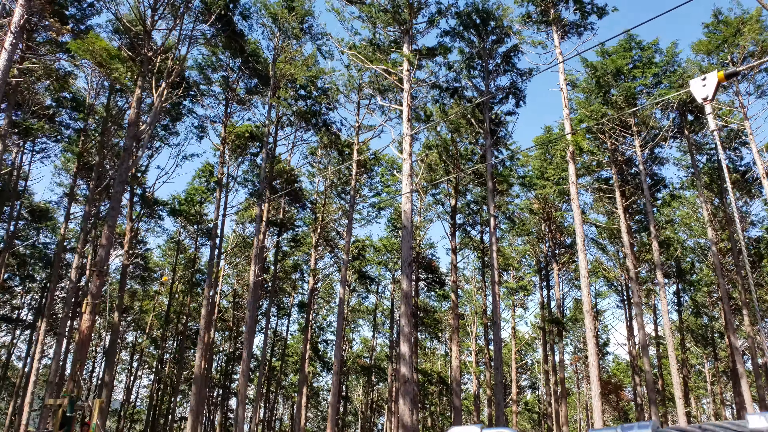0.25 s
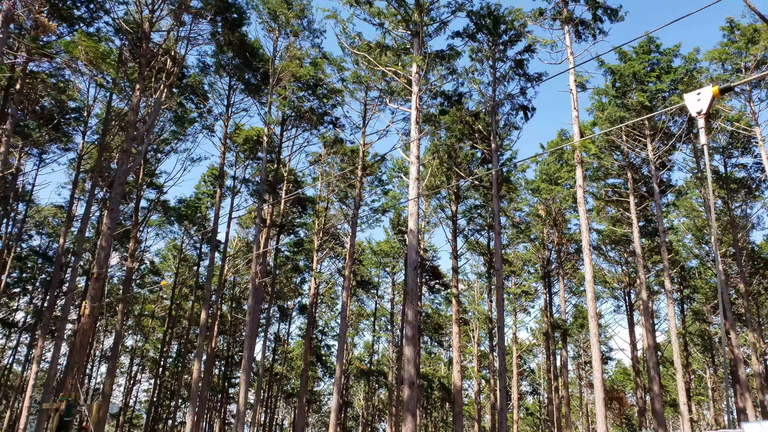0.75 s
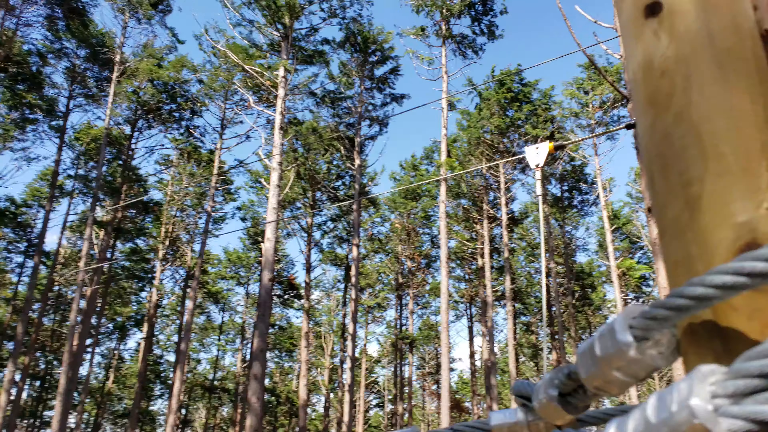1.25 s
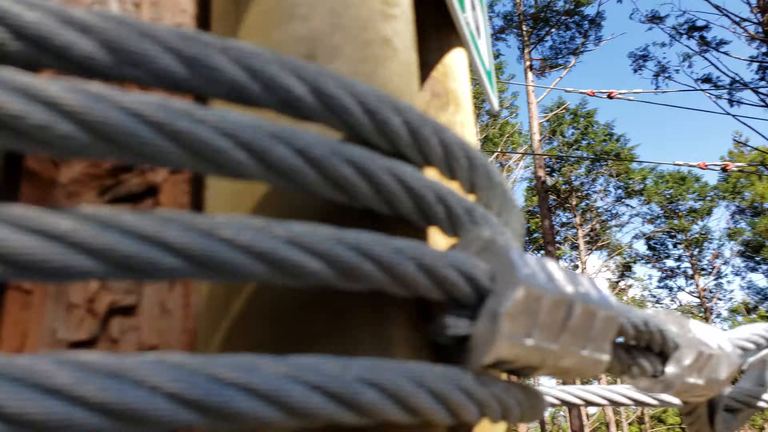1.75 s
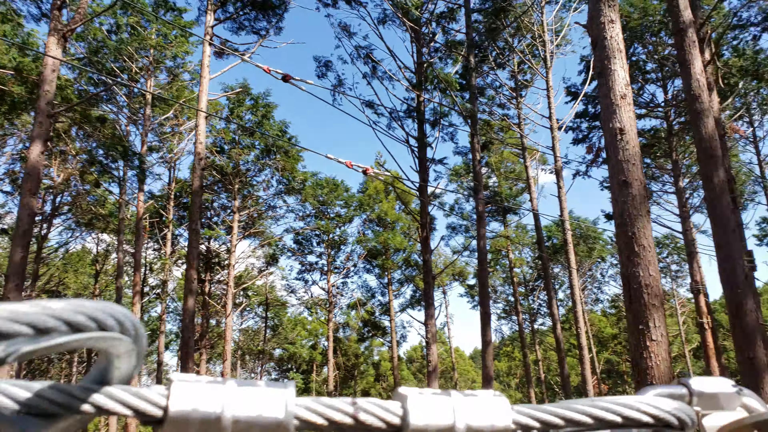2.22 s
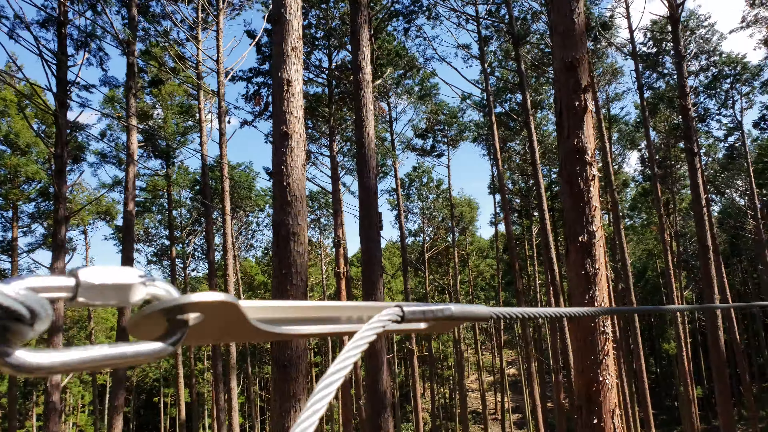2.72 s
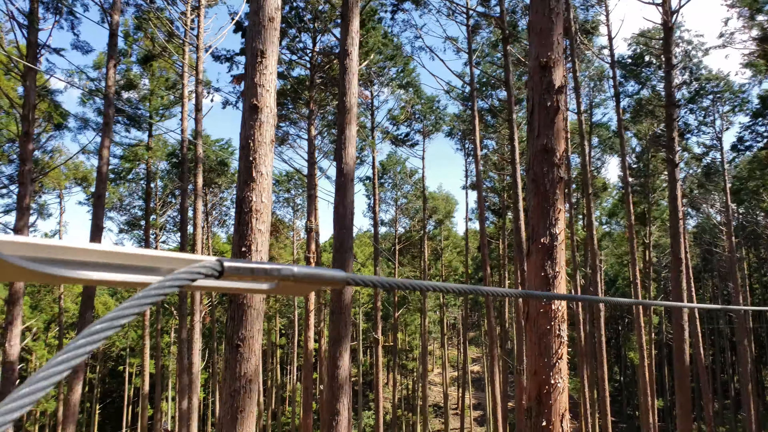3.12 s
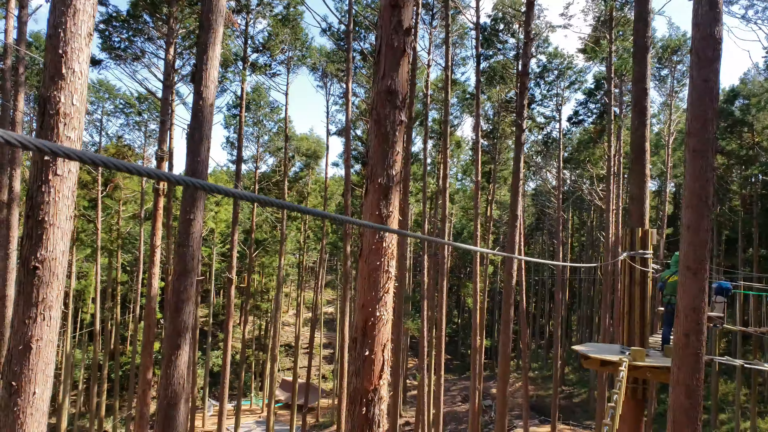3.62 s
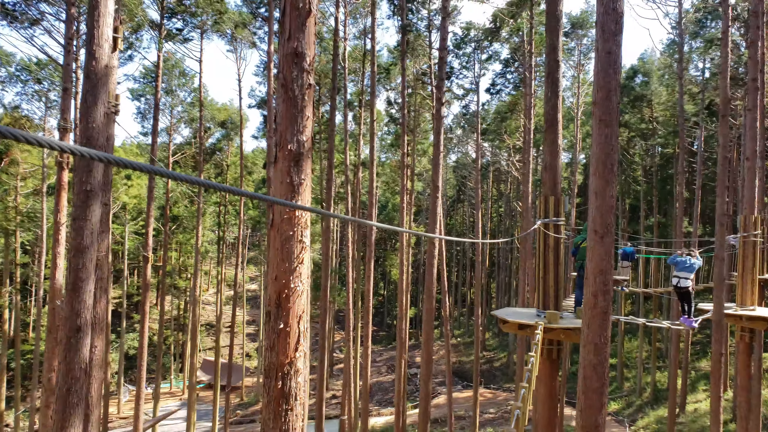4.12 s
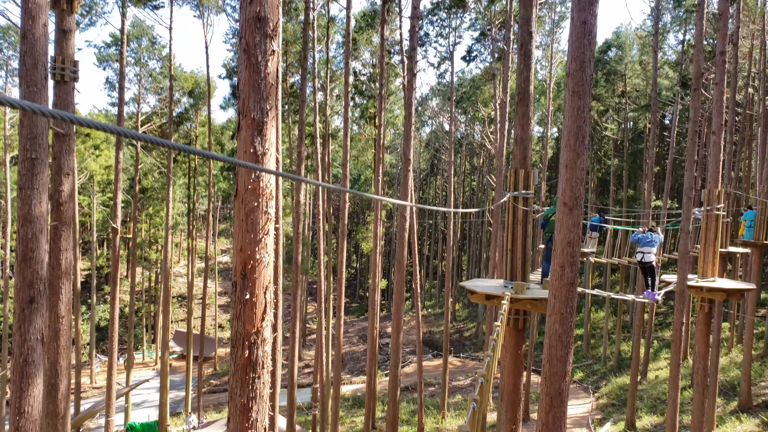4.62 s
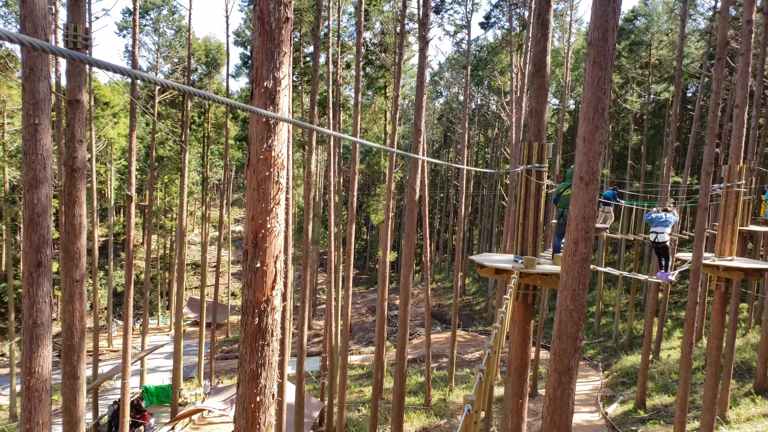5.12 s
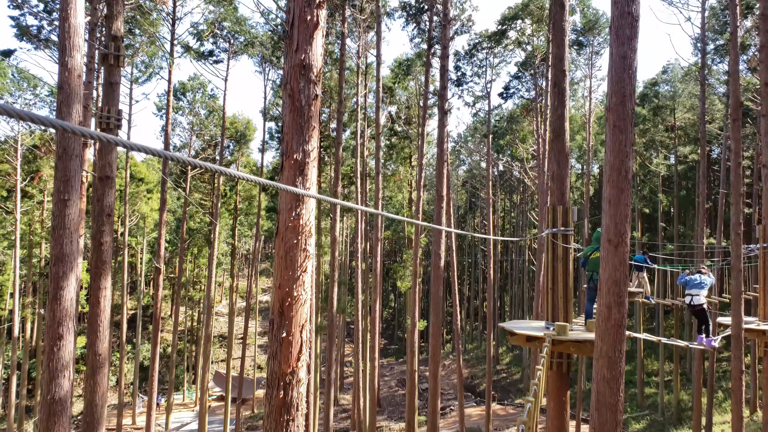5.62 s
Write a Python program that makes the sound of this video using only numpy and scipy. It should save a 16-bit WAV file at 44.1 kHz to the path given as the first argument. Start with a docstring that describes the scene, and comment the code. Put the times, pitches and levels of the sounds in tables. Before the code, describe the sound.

Heavy wind buffeting and crackling at first, thinning to reveal a zip line trolley rolling nearer, its steel cable faintly singing, with sharp ticks late.

```python
"""Gusty wind hits two microphone ports from the start, thickest in the first second: shaped noise makes
lumps, flutter, cavity ringing and spikes. Under it a pulley trolley rolls nearer along a steel zip line
in a forest, as three bands of noise that throb together. Steel fittings tick from 0.3 s, as short cracks
of noise; bright sliding hisses come near 1 s and 3.7 s. The cable sings from 2 s through narrow
resonances, and bright brushes of a wheel flange follow from 2.4 s."""
import sys
import numpy as np
from scipy import signal
from scipy.fft import rfft, irfft, next_fast_len
from scipy.io import wavfile
from scipy.ndimage import uniform_filter1d, map_coordinates

SR = 44100
rng = np.random.default_rng(int(sys.argv[2]) if len(sys.argv) > 2 else 0)


def generate_wav(sig):
    """Save sig (samples, or channels by samples) to the path in sys.argv[1] as 16-bit PCM at SR."""
    pcm = np.round(np.clip(np.atleast_2d(sig).T, -1, 1) * 32767).astype(np.int16)
    wavfile.write(sys.argv[1], SR, pcm)


N = 258426  # length in samples

# All levels in the tables are starting levels, before the functions balance the layers.
# The steady wind. Each row: time in seconds, slow pressure in dB, edge turbulence in dB.
WIND = [(0.0, -33, -34), (0.3, -41.5, -41), (0.85, -40, -39), (1.1, -38, -42), (1.45, -32.5, -40.5),
        (1.75, -37, -47), (1.95, -35.5, -49), (2.3, -40, -49), (2.7, -36.5, -49.5), (3.0, -45, -46.5),
        (3.2, -36.5, -50), (3.32, -55.5, -58.5), (3.55, -58, -46.5), (3.8, -44.5, -49.5), (4.3, -44.5, -51),
        (4.75, -52, -50), (5.15, -61.5, -54), (5.5, -56, -48.5), (5.86, -49.5, -49.5)]
# The side the wind comes from. Each row: time in seconds, left minus right in dB.
WIND_SIDE = [(0, 0.5), (0.8, 2.5), (1.5, 5.5), (2.2, 3.5), (3.0, -4), (4.0, 2.5), (5.86, 6)]
# Low lumps of air. Each row: start in seconds, level in dB, left minus right in dB, length in seconds.
THUMPS = [(0.284, -25, -11, 0.083), (0.43, -46, 3, 0.019), (0.539, -22.5, -4, 0.043),
          (0.678, -20.5, -4, 0.08), (0.884, -22.5, 7, 0.025), (0.99, -30.5, 4, 0.11),
          (1.147, -34, -2, 0.017), (1.22, -31, 0, 0.031), (1.37, -29, -1, 0.048), (1.542, -46, 3, 0.016),
          (1.686, -32, 3, 0.067), (1.82, -35, 1, 0.058), (1.907, -18.5, 3, 0.019), (2.1, -34, -5, 0.026),
          (2.387, -32.5, -6, 0.09), (2.499, -24, 4, 0.021), (2.595, -23, -5.5, .016),
          (2.696, -23.5, 11.5, .03), (2.833, -31, -3, 0.028), (2.89, -27, -1.5, 0.042),
          (2.992, -34.5, -21, .025), (3.075, -38, 11, 0.055), (3.17, -24, -3, 0.03), (3.4, -39, 5, 0.031),
          (3.573, -30.5, -3, 0.038), (3.787, -38, 15, 0.026), (3.895, -26, 0.5, 0.056),
          (4.045, -20.5, 2, 0.049), (4.189, -23, -1, 0.024), (4.304, -21, 8, 0.027),
          (4.345, -28.5, 10, 0.048), (4.476, -28.5, 10, 0.024), (4.616, -40, 5, .022), (4.7, -36, 5, 0.042),
          (4.85, -46, 11, 0.059), (5.0, -46, 4, 0.035), (5.224, -42, 6, .04), (5.36, -56, 3, .03),
          (5.47, -48, -15, 0.05), (5.6, -41, 15, 0.056), (5.675, -36, 5, .02), (5.8, -42, 10, 0.067)]
# Tone of the low lumps. Each row: frequency in Hz, density in dB per Hz.
LOW_AIR = [(12, -42), (20, -17.5), (54, -0.5), (76, 0.5), (201, -9), (330, -14), (369, -16.5), (549, -18.5),
           (687, -27), (900, -29), (1170, -53), (1980, -120)]
# Tone of the flutter at the port edges. Each row: frequency in Hz, density in dB per Hz.
EDGE_AIR = [(120, -7), (200, -4), (266, -5), (443, -12.5), (600, -4), (825, -8.5), (1170, -1), (1690, -9),
            (4610, -22.5), (9000, -40.5), (11700, -73), (19800, -120)]
# Sharp gust fronts. Each row: start in seconds, level in dB, left minus right in dB, length in seconds,
# dull part in dB relative to the front.
GUSTS = [(0.023, -12.5, -8.5, 0.019, -6), (0.054, -23, -10, 0.041, -14), (0.087, -10.5, -4, 0.026, -12),
         (0.096, -12, 8, 0.028, -6), (0.126, -14, -1, 0.038, 0.5), (0.17, -28, -8, 0.015, 8),
         (0.218, -27.5, -18, 0.024, -3), (0.268, -12.5, 0.5, .015, -9), (0.306, -9.5, 2, 0.037, -2.5),
         (0.331, -6, -1, .026, -21), (0.362, -15, -1.5, 0.032, 1.5), (0.46, -33, -17, .021, -12),
         (0.587, -30, -15, 0.047, -2), (0.687, -11, 1, 0.071, -7), (0.751, -11.5, -7.5, 0.028, -11),
         (0.872, -34, -8, 0.017, 6), (0.888, -19.5, -3.5, 0.047, 0), (0.945, -27.5, 0, 0.056, 8),
         (0.997, -34, -8, .03, 5), (1.02, -28, 1, .015, 6), (1.076, -20, 0.5, 0.037, 5.5),
         (1.129, -26.5, -14.5, 0.024, -1), (1.365, -29, -11, 0.031, 4), (1.456, -16, -.5, 0.027, 3),
         (1.547, -39, -6, 0.012, -8), (1.645, -27.5, -17.5, 0.062, 0.5), (1.801, -33.5, -12, 0.015, 4),
         (1.915, -37, -12, 0.045, 3), (2.052, -24, -10, 0.0082, -9), (2.325, -34.5, -4, .018, 12.5),
         (2.375, -36.5, 7, 0.013, 14), (2.495, -27.5, 0, .02, 5), (2.688, -31.5, 7, .029, -3),
         (2.744, -32.5, -7, 0.027, 2), (2.785, -16, -1, 0.025, 5), (2.845, -34, -13, .017, -21),
         (2.876, -31, -13, .013, -2), (2.91, -33.5, -1, 0.023, 20), (2.967, -32.5, -3, 0.053, 13),
         (3.059, -38, -8, .014, -12), (3.163, -28.5, 2, 0.015, 11.5), (3.195, -38, -1, 0.015, 12),
         (3.222, -32.5, 3.5, 0.038, 12), (3.424, -29.5, -4, 0.03, 0.5), (3.595, -33, -9, 0.0099, 5),
         (3.783, -28.5, -5, 0.046, -4), (4.039, -32, -8, 0.027, 3), (4.058, -36.5, 4, 0.033, 15.5),
         (4.191, -32.5, -4, .015, -2), (4.287, -32, -7, 0.018, 4), (4.349, -28, 0.5, 0.012, 14.5)]
# A port cavity struck by a gust. Each row: frequency in Hz, density in dB per Hz.
CAVITY = [(240, -26), (400, -12.5), (494, -26), (797, -16.5), (977, -15), (1110, -2.5), (1250, -3.5),
          (2010, -10), (2600, -20.5), (3380, -38), (5720, -120)]
# The bright edge of a strong spike. Each row: frequency in Hz, density in dB per Hz.
SHARP = [(1200, -85), (2200, 7.5), (3500, 2.5), (5500, -12.5), (9000, -27), (16000, -34)]
# The dull part of a gust, which misses the cavity. Each row: frequency in Hz, density in dB per Hz.
DULL = [(120, -15.5), (250, -22.5), (500, -18), (900, -17.5), (1800, -25), (4000, -60)]
# The trolley, far then near. Each row: time in seconds, drone in dB, rasp in dB, fizz in dB.
ROLL = [(0.0, -45.5, -54, -56.5), (0.5, -48.5, -55, -61), (1.0, -52.5, -58, -62), (1.45, -50, -48.5, -49.5),
        (1.75, -47, -48.5, -51.5), (2.0, -50.5, -53.5, -57.5), (2.3, -51, -52.5, -60.5),
        (2.9, -51, -54.5, -59), (3.15, -49, -50, -54), (3.4, -48.5, -49.5, -54.5), (3.75, -48, -49, -53),
        (4.2, -47, -45.5, -47), (4.55, -45.5, -46.5, -42), (4.7, -42.5, -46.5, -51),
        (4.82, -44.5, -43, -46), (4.95, -46.5, -46, -46.5), (5.11, -43.5, -42.5, -43.5),
        (5.15, -43.5, -37.5, -38), (5.3, -43.5, -41, -42), (5.45, -42.5, -37.5, -42),
        (5.86, -40.5, -40, -43.5)]
# Tones of the three rolling parts. Each row: frequency in Hz, density in dB per Hz.
DRONE = [(210, -56), (350, -27), (383, -15), (499, -37), (916, -17.5), (1250, -8), (1360, -13), (1940, -5),
         (2500, -9), (3250, -19.5), (5500, -120)]
RASP = [(1470, -8), (2500, -21), (2880, 6.5), (3580, 6), (3910, 5.5), (4330, 5.5), (5160, 10.5), (6460, 5),
        (8000, 5), (10400, -26), (17600, -120)]
FIZZ = [(4410, -44), (7500, -7), (7900, -9), (9320, -9.5), (12200, -4), (12700, -11), (15600, -13)]
# Single hard spikes inside the gusts. Each row: start in seconds, level in dB, left minus right in dB.
POPS = [(0.027, -26, -13), (0.1, -16, 5), (0.104, -19, -9), (0.136, -26.5, 7), (0.183, -30, -11),
        (0.236, -31, -10), (0.27, -34, -5), (0.312, -26, 4), (0.3217, -26, -1), (0.341, -22, 3),
        (0.434, -35, -8), (0.4793, -31, -7), (0.605, -31, -8.5), (0.715, -26, 5), (0.733, -26, 3),
        (0.765, -32, -8), (0.8, -33, -12), (1.657, -30, -11), (1.951, -35, -8), (2.333, -39, -6),
        (2.506, -37, -3), (2.76, -37, -8), (2.849, -39, -8), (2.883, -41, -8), (3.068, -40, -8),
        (3.122, -43, -8)]
# Cracks of steel. Each row: start in seconds, level in dB, low part in dB relative to the crack,
# left minus right in dB, time to fall by 60 dB in seconds.
TICKS = [(0.3133, -40, 6, 4, 0.0073), (0.702, -37, -14, -4, 0.0089), (2.241, -50, 11.5, -2, 0.008),
         (2.2618, -40, -10, 0.0, 0.0087), (2.288, -27.5, -27, 1, 0.0084), (2.4435, -41, 3, -0.5, 0.008),
         (2.666, -34, 2, 2, 0.012), (2.9894, -45, -4, 0.0, 0.008), (3.3844, -49, -5, 0.0, 0.008),
         (3.5494, -38, -6, 0.5, 0.0094), (5.6119, -18.5, 0, -12.5, 0.0054), (5.724, -25, -5, -1, 0.008)]
# Two sliding hisses, one list each. Each row: time in seconds, level in dB.
SLIDES = [
    [(1.0, -58), (1.108, -63), (1.174, -54.5), (1.348, -49), (1.456, -45.5), (1.604, -56), (1.714, -59.5),
     (1.884, -61), (2.0, -75)],
    [(3.7, -71), (3.844, -47), (4.022, -44), (4.084, -42), (4.434, -51), (4.556, -49), (4.7, -86)],
]
# Tones of the two hisses, one list each. Each row: frequency in Hz, density in dB per Hz.
SLIDE_COLOURS = [
    [(2350, -33), (4000, -7), (5260, -11), (5530, -10), (5990, -11), (6490, -13), (7660, -7), (10200, -4),
     (10900, -4.5), (12100, 0), (14300, -11), (14700, -7), (15600, -13)],
    [(1760, -39), (3000, -10), (3560, -8), (4240, -3), (4600, -14), (5740, -1), (6450, -2.5), (6960, 1.5),
     (8160, -3), (9050, -9), (10100, 0), (13000, -4), (15600, -1)],
]
# The singing cable. Each row: time in seconds, low modes in dB, high modes in dB.
RINGING = [(2.0, -68, -81), (2.41, -65, -66), (3.14, -67, -61), (3.5, -66, -57.5), (3.85, -59, -65),
           (4.35, -63, -52), (4.6, -58.5, -54), (5.07, -51, -60), (5.25, -48, -58), (5.86, -47, -57)]
# Modes of the cable. Each row: frequency in Hz, width in Hz, level in dB.
LOW_MODES = [(2030, 140, -3), (2870, 110, -1), (3870, 70, -3), (4640, 80, -1), (5120, 160, -4),
             (5950, 90, -5), (6630, 50, 0), (9050, 45, -4)]
HIGH_MODES = [(12000, 230, 0), (12600, 120, -8), (14400, 260, -3)]
# Brushes of a wheel flange on the cable. Each row: start in seconds, level in dB.
CHAFES = [(2.407, -40), (2.54, -34), (3.214, -34), (4.716, -33), (4.783, -26), (4.846, -36), (5.087, -23),
          (5.128, -22.5), (5.141, -27), (5.203, -25), (5.32, -26), (5.396, -25), (5.573, -29)]

VEER_DB, EDGE_PAN_DB = 4.5, -4  # how far the wind wanders between ports; the right edge flutters more
EDGE_KNEE_DB, EDGE_LAG = -26.5, 0.58  # a bright edge grows slower than its front around this level
SHRED_OVER_DB, SHRED_S, SHRED_PAN_DB = 6.5, 0.02, -6  # small fronts: level over the turbulence, length, side
POP_S = 0.0034  # length of a spike in seconds
CHAFE_S, CHAFE_PAN_DB = 0.022, -1.2  # length of a brush in seconds, left minus right
TOP_HZ = 15760  # upper band limit


def amp(db):
    """Turns dB into a plain gain."""
    return 10 ** (np.asarray(db) / 20)


def unit(x):
    """Scales x to an rms of 1."""
    return x / np.sqrt(np.mean(x ** 2) + 1e-20)


def curves(rows):
    """One value per sample for each column after the time."""
    s, *cols = np.transpose(rows)
    return [np.interp(np.arange(N) / SR, s, c) for c in cols]


def wobble(rate, channels=1):
    """Smooth random curves with rate random points a second, up to 200."""
    knots = rng.standard_normal((channels, int(N * 200 / SR) + 4))
    coarse = np.arange(0, N + 32, 32)  # smooth on a coarse grid, then straight lines between
    return np.array([np.interp(np.arange(N), coarse, map_coordinates(k, [coarse * rate / SR]))
                     for k in knots])


def filtered(x, response):
    """Multiplies the spectrum of x by a response that depends on frequency."""
    m = next_fast_len(N + 8192)
    return irfft(rfft(x, m) * response(np.fft.rfftfreq(m, 1 / SR)), m)[..., :N]


def colour(points):
    """Gain through (Hz, dB) points on a log axis, keeping the power of white noise."""
    f, v = np.transpose(points)
    return lambda hz: unit(amp(np.interp(np.log(hz + 1), np.log(f + 1), v)))


def resonant(modes):
    """Gain of narrow (Hz, width, dB) peaks, keeping the power of white noise."""
    return lambda hz: unit(sum(amp(db) / (1 + (2 * (hz - c) / w) ** 2) for c, w, db in modes))


def panned(pan_db):
    """Left and right gains that differ by pan_db."""
    return amp(np.array([pan_db / 2, -pan_db / 2]))


def spiky(spread_db, rate):
    """Two unrelated noises whose size jumps about rate times a second, rms 1 overall."""
    step = max(int(SR / rate), 16)
    sizes = amp(spread_db * rng.standard_normal((2, N // 16 + 1)))
    return unit(rng.standard_normal((2, N)) * sizes[:, np.arange(N) // step])


def swells(rows, rise):
    """Sum of quick swells, one per row: start in seconds, dB, left minus right in dB, length in seconds."""
    out = np.zeros((2, N + SR))
    for s, db, pan_db, length in rows:
        u = np.arange(int(abs(length) * 3 * SR) + 2) / (abs(length) * SR + 1)  # time in lengths
        shape = (1 - np.exp(-u / rise)) * np.exp(-(u * 1.278) ** 2)
        out[:, round(s * SR):][:, :len(u)] += amp(db) * panned(pan_db)[:, None] * shape
    return out[:, :N]


def airborne(alike, lag, patchy_db):
    """Noise that reaches both ports partly alike, the left lag samples late, in patches of random gain."""
    common, left, right = rng.standard_normal((3, N)).astype(np.float32)
    alike = np.float32(np.clip(alike, 0, 1))
    shared = np.array([np.roll(common, lag), common])
    pair = np.sqrt(alike) * shared + np.sqrt(1 - alike) * np.array([left, right])
    z = signal.stft(pair, nperseg=512)[2]
    # smooth over neighbouring frequencies, then over time
    field = uniform_filter1d(uniform_filter1d(rng.standard_normal(z.shape[1:]), 6, 0), 10, 1)
    patches = amp(patchy_db * unit(field)).astype(np.float32)
    return unit(signal.istft(z * patches, nperseg=512)[1][:, :N])


def buffet():
    """Slow pressure lumps of wind, unrelated from port to port."""
    db = curves(WIND)[0]
    veer = VEER_DB * wobble(9, channels=2)
    unrest = 1.64 * wobble(14, channels=2) + 2.16 * wobble(35, channels=2)
    steady = amp(db + veer + unrest) * panned(curves(WIND_SIDE)[0])
    strength = steady + amp(-3.0) * swells(THUMPS, rise=0.24)
    return filtered(strength * spiky(spread_db=2.5, rate=240), colour(LOW_AIR))


def eddies():
    """Small eddies at the port edges make a rough flutter."""
    db = curves(WIND)[1]
    unrest = 1.6 * wobble(8) + 4.0 * wobble(25) + 1.56 * wobble(40, channels=2)
    flutter = amp(db + unrest) * panned(EDGE_PAN_DB + 3 * wobble(6.7)[0])
    return filtered(flutter * spiky(spread_db=5, rate=900), colour(EDGE_AIR))


def scattered(count, end_s, over_db, pan_db, length):
    """Random swell rows whose level rides on the edge turbulence."""
    when, size, side = rng.random((count, 3)).T
    start_s = when * end_s
    s, _, edge_db = np.transpose(WIND)
    db = np.interp(start_s, s, edge_db) + over_db - 4 * np.log(size + 0.058)  # a few come out much louder
    return np.transpose([start_s, db, pan_db + 12 * (side - .5), np.full(count, length)])


def gusts():
    """Each gust front is a cluster of pressure spikes that ring the port cavity."""
    rows = np.array(GUSTS)
    small = scattered(count=36, end_s=4.5, over_db=SHRED_OVER_DB, pan_db=SHRED_PAN_DB, length=SHRED_S)
    front = np.vstack([rows[:, :4], small])
    level_column = [0, 1, 0, 0]  # adds dB to the level column only
    dull_db = np.append(rows[:, 4], np.full(len(small), 4.0))
    bright_db = EDGE_LAG * (EDGE_KNEE_DB - front[:, 1])
    ragged = amp(2.5 * wobble(110, channels=2))  # the two ports catch different shreds of a front

    ringing = swells(front, rise=0.73) * ragged * spiky(spread_db=6.0, rate=1300)
    edges = swells(front + np.outer(bright_db, level_column), rise=0.67) * spiky(spread_db=7.0, rate=700)
    thuds = swells(front + np.outer(dull_db, level_column), rise=0.55) * spiky(spread_db=5, rate=500)
    return (amp(-4.0) * filtered(ringing, colour(CAVITY))
            + amp(-17.5) * filtered(edges, colour(SHARP))
            + amp(-7.5) * filtered(thuds, colour(DULL)))


def trolley():
    """The wheels ride over the strands: a drone, a rasp and a fizz that throb together."""
    strands = 1.32 * wobble(90) + 0.37 * wobble(22.21) + 0.98 * wobble(8)
    out = 0
    for db, points in zip(curves(ROLL), (DRONE, RASP, FIZZ)):
        strength = amp(db + strands + 0.68 * wobble(10))  # each part also wavers a little alone
        out = out + filtered(strength * airborne(alike=0.3, lag=-14, patchy_db=2.0), colour(points))
    return out


def pops():
    """A spike is over in a few milliseconds and has the colour of a gust's edge."""
    rows = [(s, db, pan_db, POP_S) for s, db, pan_db in POPS]
    return amp(-0.5) * filtered(swells(rows, rise=0.22) * rng.standard_normal((2, N)), colour(SHARP))


def ticks():
    """Short cracks of steel on steel, each with a bright part and a lower part that pings the cable."""
    bright, low = np.zeros((2, N + SR)), np.zeros((2, N + SR))
    t = np.arange(SR // 20) / SR
    for s, db, low_db, pan_db, t60 in TICKS:
        fall = amp(db - 60 * t / max(t60, 1e-3))
        crack = rng.standard_normal((2, len(t))) * fall * panned(pan_db)[:, None]
        bright[:, round(s * SR):][:, :len(t)] += crack
        low[:, round(s * SR):][:, :len(t)] += crack * amp(low_db)
    high_part = colour([(4500, -24), (6500, -4), (16000, -3), (17000, -40)])
    low_part = colour([(600, -40), (1300, -2), (5000, -5), (7000, -35)])

    def ping(hz):
        """Resonances at the low modes, which ring on after the crack."""
        return sum(amp(db) * 1j * hz * w / (c * c - hz * hz + 1j * hz * w) for c, w, db in LOW_MODES)

    high_sound = filtered(bright[:, :N], high_part)
    low_sound = filtered(low[:, :N], lambda hz: low_part(hz) + amp(7.5) * ping(hz))
    return amp(-0.5) * (high_sound + low_sound)


def slides():
    """Something slides twice: smooth bright noise, faded to silence outside each span."""
    out, t = 0, np.arange(N) / SR
    for rows, points, lag in zip(SLIDES, SLIDE_COLOURS, (14, -7)):
        s, db = np.transpose(rows)
        fade = np.clip(np.minimum(t - s[0], s[-1] - t) / 0.093, 0, 1)  # 93 ms at both ends
        strength = fade * amp(np.interp(t, s, db) + 7.5)
        out = out + filtered(strength * airborne(alike=0.22, lag=lag, patchy_db=4.0), colour(points))
    return out


def cable():
    """The modes of the cable come and go as the wheels shake it; silent until the trolley is near."""
    near = np.clip(np.arange(N) / SR - RINGING[0][0], 0, .3) / .3  # fades in over 0.3 s
    low_db, high_db = curves(RINGING)
    low = amp(low_db + 5 + 2 * wobble(14)) * airborne(alike=.4, lag=-15, patchy_db=3.5)
    high = amp(high_db + 2 + 4.5 * wobble(18)) * airborne(alike=.4, lag=-10, patchy_db=3)
    return filtered(near * low, resonant(LOW_MODES)) + filtered(near * high, resonant(HIGH_MODES))


def chafes():
    """A wheel flange brushes the cable: brief swells of bright noise."""
    rows = [(s, db, CHAFE_PAN_DB, CHAFE_S) for s, db in CHAFES]
    brush = swells(rows, rise=.4) * airborne(alike=0.46, lag=-10, patchy_db=4.0)
    steel = colour([(5000, -30), (7000, 2), (9000, 4), (12000, 11), (15500, -1)])
    return amp(-8.0) * filtered(brush, steel)


def scene():
    """Adds wind, trolley, cable and steel together."""
    wind = buffet() + eddies() + gusts() + pops()
    return wind + trolley() + cable() + chafes() + slides() + ticks()


def record(dry):
    """Keeps nothing at or above the upper band limit."""
    return filtered(dry, lambda hz: hz < TOP_HZ)


dry = scene()
out = record(dry)
generate_wav(out)
```